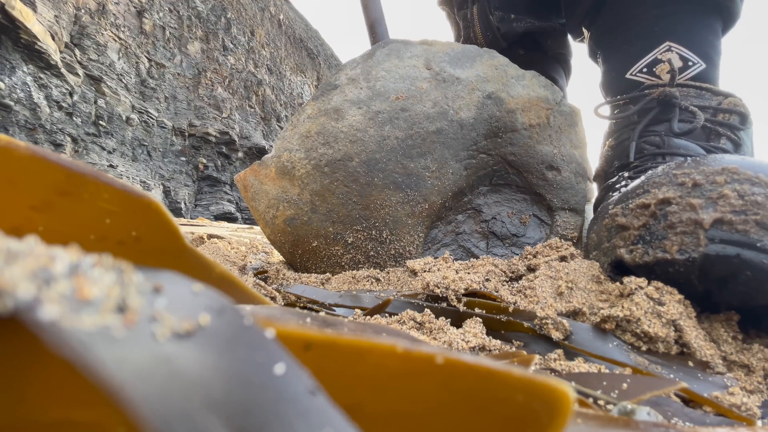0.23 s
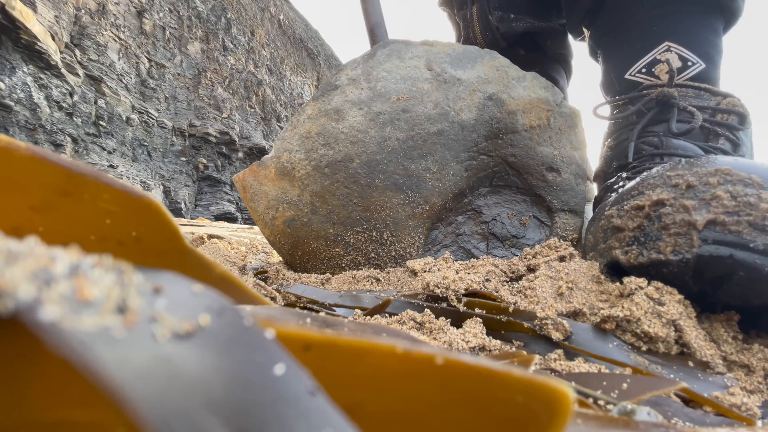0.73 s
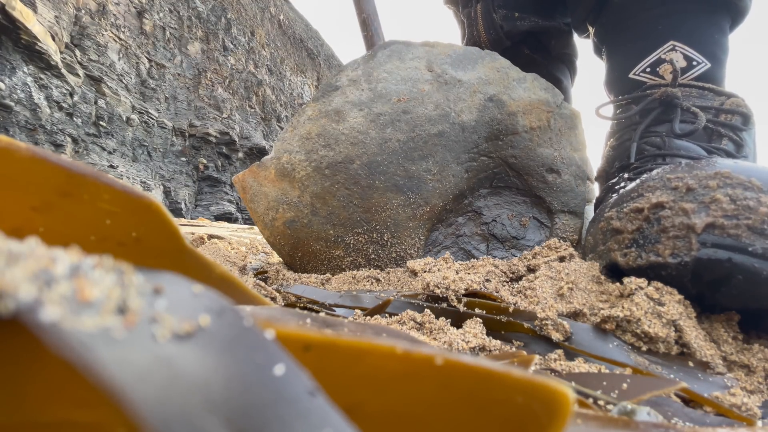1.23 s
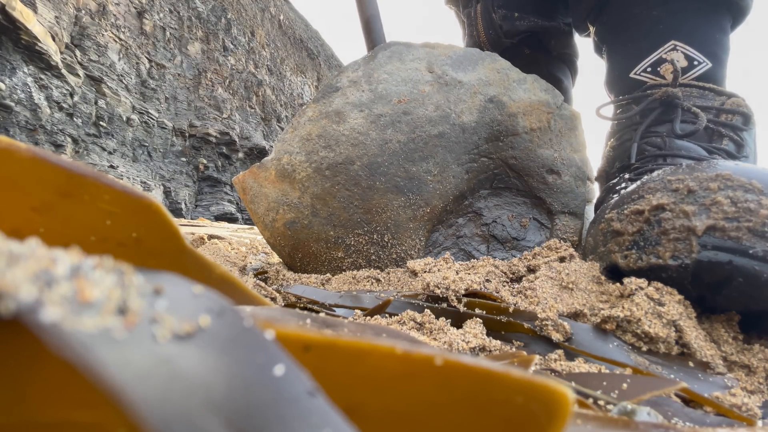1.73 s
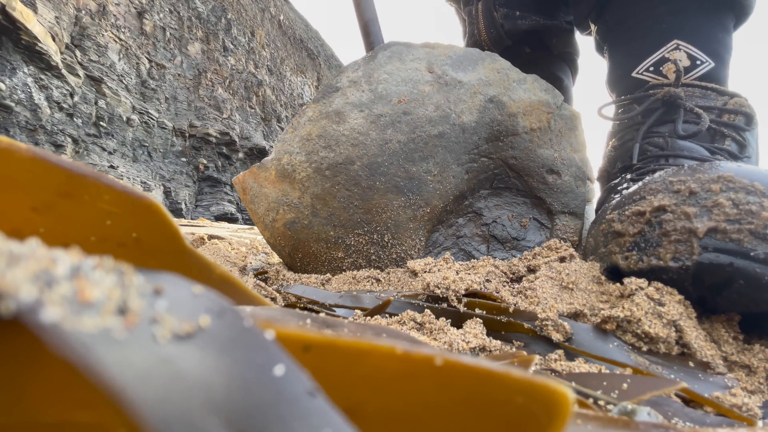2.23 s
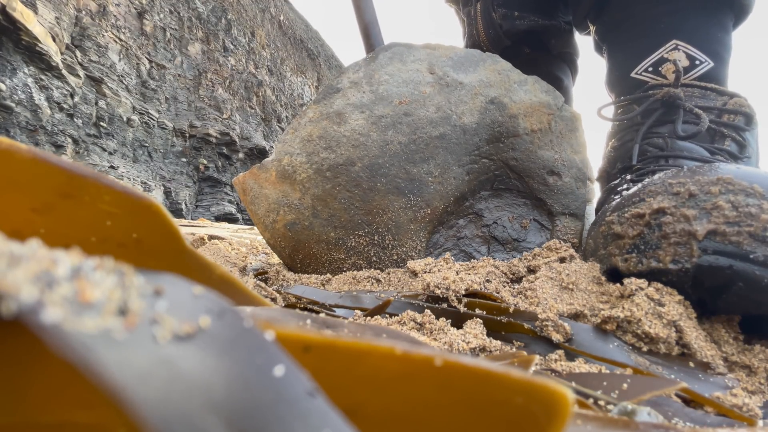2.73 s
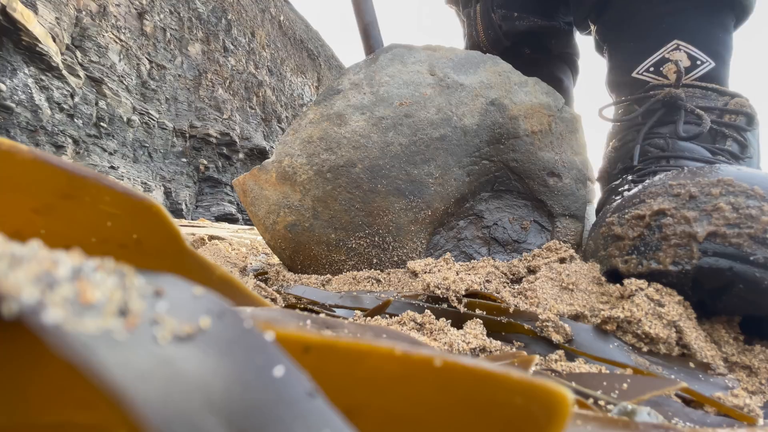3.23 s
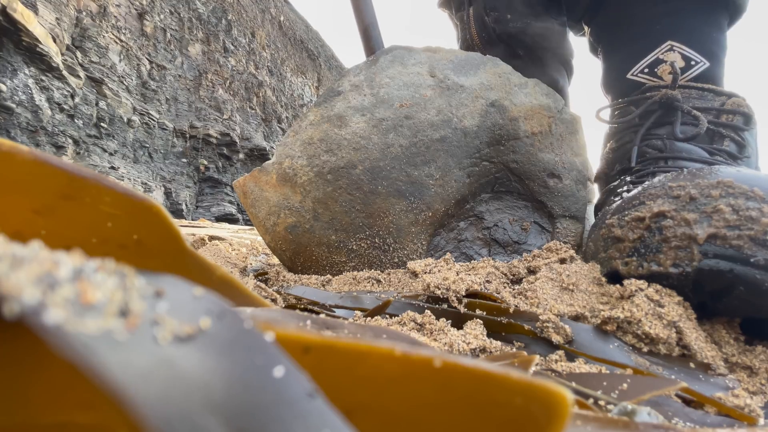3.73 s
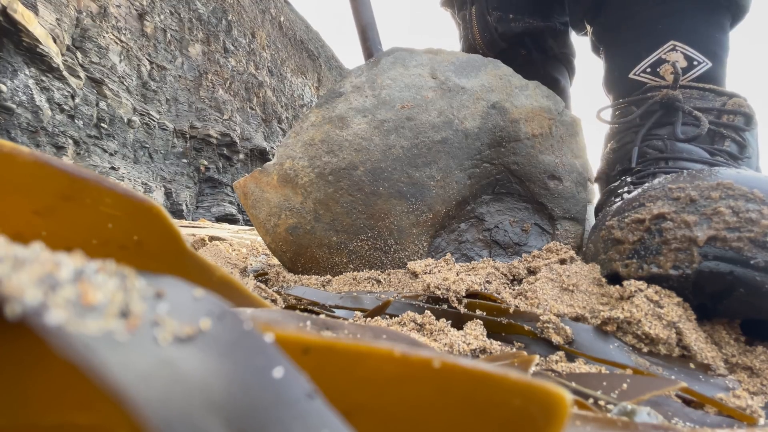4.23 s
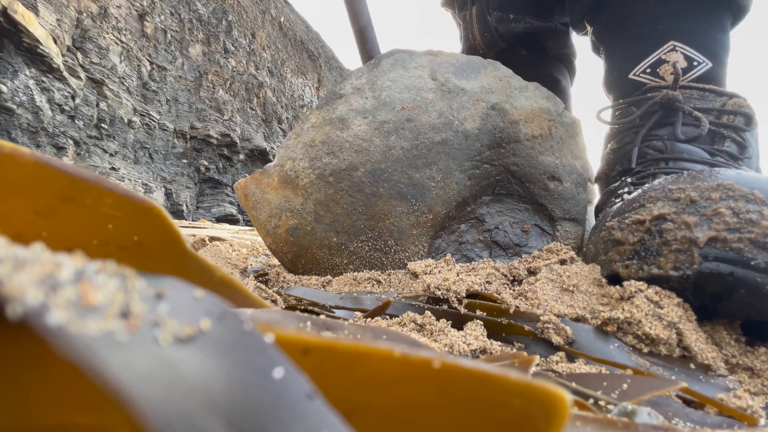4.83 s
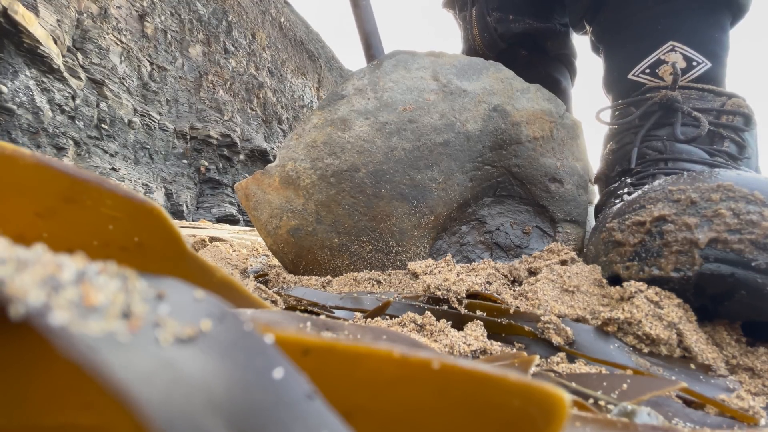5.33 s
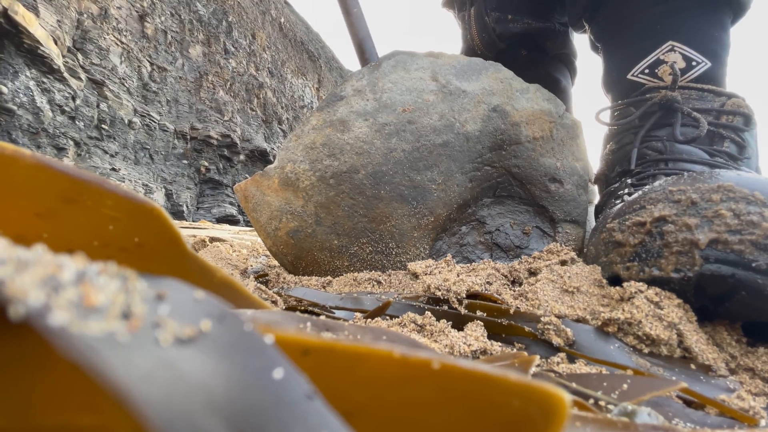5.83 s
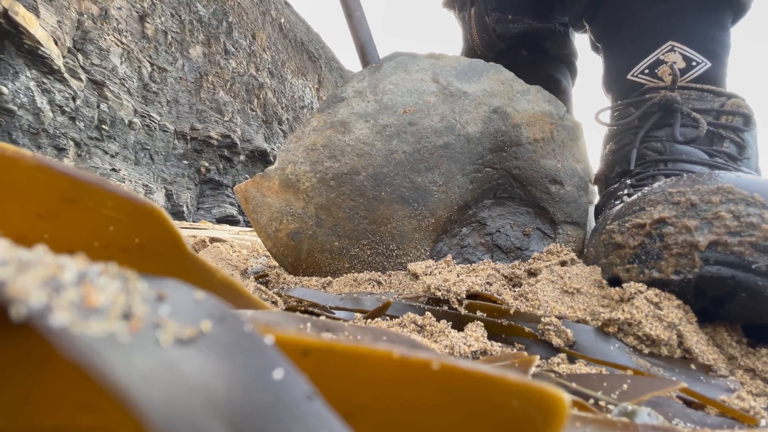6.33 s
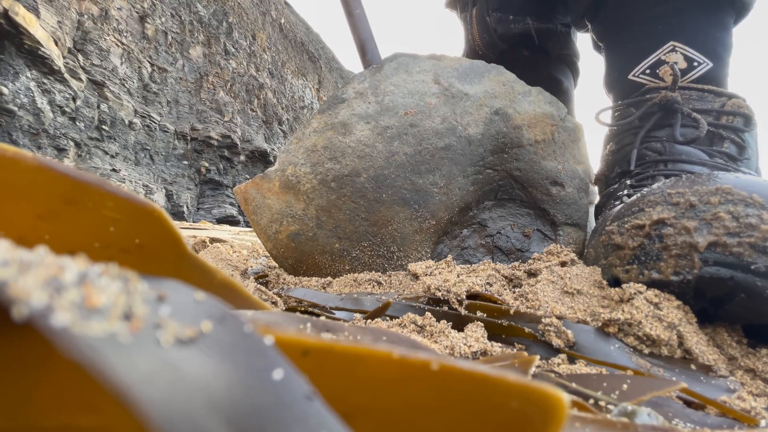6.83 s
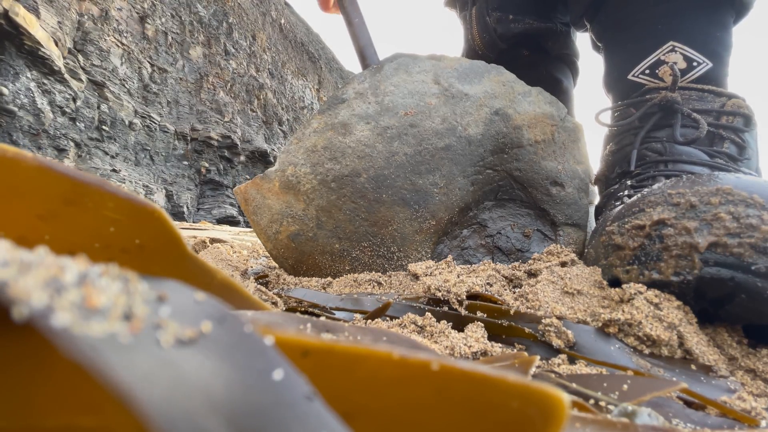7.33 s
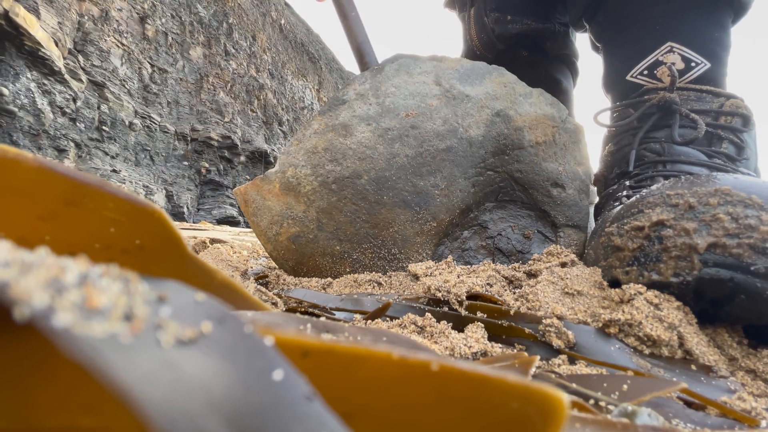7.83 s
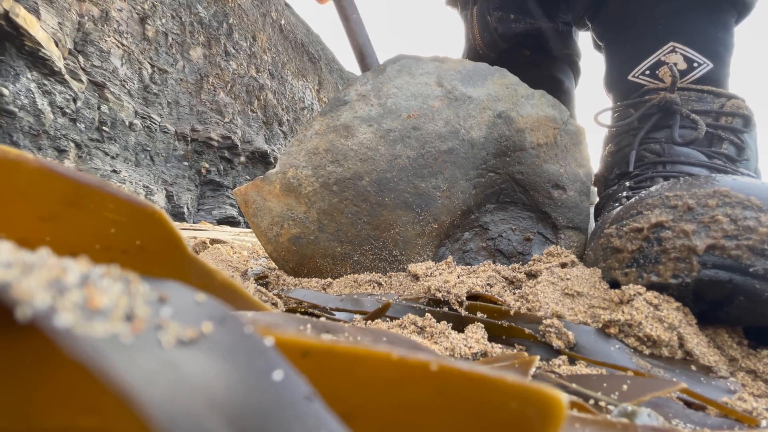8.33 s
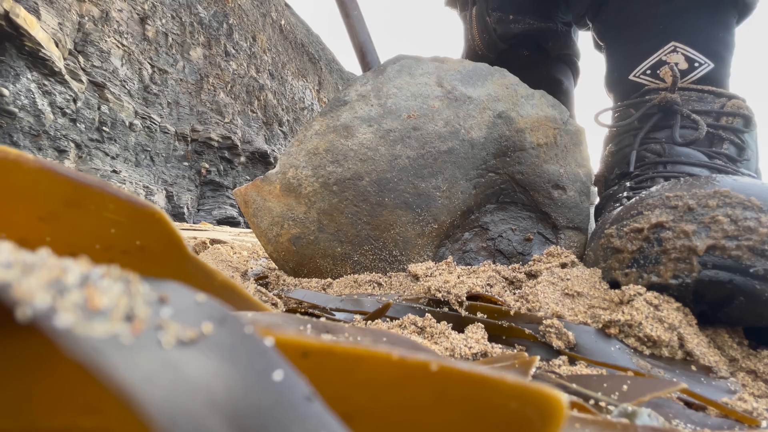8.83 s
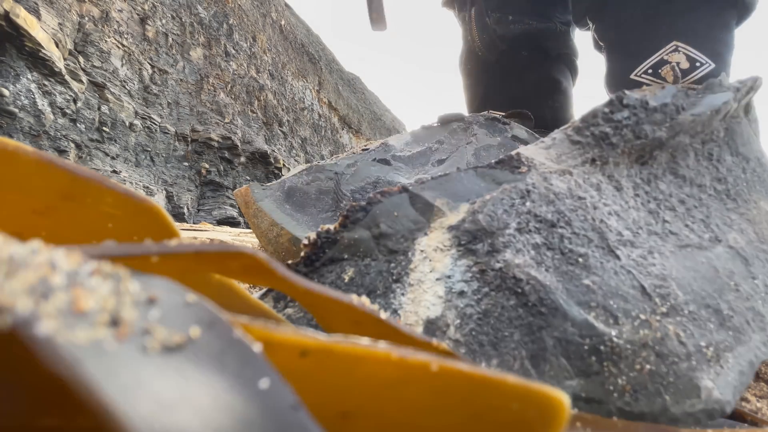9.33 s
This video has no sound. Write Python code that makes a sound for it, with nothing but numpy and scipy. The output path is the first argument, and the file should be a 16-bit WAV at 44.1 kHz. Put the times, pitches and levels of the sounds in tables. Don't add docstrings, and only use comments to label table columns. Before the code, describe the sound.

Outdoors on a sandy shore, with the microphone close to a boulder, a hammer drives a steel chisel. The first blow lands almost at once, then others at about 0.5, 1.1, 1.6, 2.3, 2.8, 3.5, 4.0, 4.8, 5.3, 6.1, 6.6, 7.6 and 8.1 seconds. Each is a loud, dry crack with bright, quickly choked metal ringing, a woody stone knock and a soft low thump arriving later through the sand; the ones near 1.6 and 4.8 have less body. Distant surf hisses steadily, clearest at the start, ducking after each blow and sinking until nearly gone. Chips tick at 5.4, 6.9 and 8.4-8.6 seconds. At 8.9 the strongest, duller blow splits the stone: within two tenths of a second the halves grind and rattle, sand trickles, and they land with a thud, leaving near quiet.

```python
import sys
import numpy as np
from scipy import signal
from scipy.fft import rfft, irfft, next_fast_len
from scipy.io import wavfile
from scipy.ndimage import uniform_filter1d

SR = 44100
rng = np.random.default_rng(int(sys.argv[2]) if len(sys.argv) > 2 else 0)


def generate_wav(signal):
    frames = np.transpose(np.atleast_2d(signal))
    scaled = np.clip(frames, -1, 1) * 32767
    pcm = np.round(scaled).astype(np.int16)
    wavfile.write(sys.argv[1], SR, pcm)


def ratio_of_db(decibels):
    return 10 ** (np.asarray(decibels, float) / 20)


N = 422037
TIME = np.arange(N) / SR

# [t/s, bite (stone knock)/dB, loose grip (shaft hum)/dB, edge (sharp stone contact)/dB,
# slant (sideways against lengthways ring)/dB]
BLOWS = [(0.062, -16.5, -48, -22, -1.5), (0.494, -17, -49.5, -32.5, -9), (1.134, -16.5, -33.5, -35, 0),
         (1.618, -28, -55, -23, 14.5), (2.321, -17.5, -50.5, -34, 18), (2.792, -16.5, -52.5, -25, -2),
         (3.549, -16, -37.5, -27.5, 3), (4.019, -16.5, -44, -27.5, 2), (4.819, -23, -59, -21.5, .6),
         (5.321, -15, -42.5, -26.5, -1.5), (6.105, -15.5, -53, -30, -5.5),
         (6.581, -14.5, -39.5, -28.5, -3.5), (7.641, -18, -53, -38, -3), (8.111, -13.5, -40, -24.5, -10),
         (8.927, -12, -49, -19.5, -5.5)]
# [f/Hz, density/dB per Hz]
CRACK_SPECTRUM = [(700, -13.5), (1100, -15), (2000, -19), (3300, -4.5), (4200, -14), (6500, -5.5),
                  (8500, -7.5), (10000, -14.5), (11300, -9), (12600, -10), (14800, -2), (16500, -17)]
LEAD_S = .02


def at_hz(points, hz):
    f_hz, level_db = np.transpose(points)
    return np.interp(np.log(hz + 1), np.log(f_hz), level_db)


def colour(x, gain_db):
    size = next_fast_len(x.shape[-1])
    gain = ratio_of_db(gain_db(np.fft.rfftfreq(size, 1 / SR)))
    return irfft(rfft(x, size) * gain, size)[..., :x.shape[-1]]


def rms_one(x):
    return x / np.sqrt(np.mean(x ** 2))


def peak_one(x):
    return x / np.abs(x).max()


def sine(hz, t):
    return np.sin(2 * np.pi * hz * t)


def swell(t, rise_s, t60_s):
    t = np.maximum(t, 0)
    shape = (1 - np.exp(-t / max(rise_s, 1e-4))) ** 2 * ratio_of_db(-60 * t / t60_s)
    return shape / shape.max()


def strike(t, rise_s, length_s):
    build = np.exp(np.minimum(t, 0) / rise_s)
    return np.where(t < 0, build, np.exp(-(np.abs(t) / length_s) ** 1.58))


def pair(db):
    return ratio_of_db(np.array([[db / 2], [-db / 2]]))


def add(out, sound, s):
    i = round(s * SR)
    out[:, i:i + sound.shape[1]] += sound[:, :N - i]


def drift(rate_hz):
    knots = rng.standard_normal(400)
    return uniform_filter1d(np.interp(TIME * rate_hz, np.arange(len(knots)), knots), size=400)


def surf(patchy_db=1.1):
    # [f/Hz, density/dB per Hz]
    mid_spectrum = [(15, -44), (25, -19.5), (54, -5), (244, -1.5), (403, -3), (448, -5.5), (991, -4.5),
                    (1330, -11.5), (1600, -6.5), (2570, -5.5), (3350, -11.5), (8030, -8), (10200, -13),
                    (11900, -8.5), (14000, -49.5)]
    side_spectrum = [(15, -50.5), (25, -21.5), (113, -16), (353, -5.5), (382, -12.5), (448, -2.5),
                     (741, -4), (1780, -8), (2440, -23), (3010, -13.5), (4370, -17.5), (10500, -10),
                     (11300, -13.5), (12300, -45), (14000, -55.5)]
    # [f/Hz, left-right/dB]
    surf_left = [(60, 3), (180, 0.5), (550, 4.5), (1650, 4), (4970, 3.5), (15000, 2.5)]
    # [f/Hz, width/Hz, depth/dB]
    shared_dips = [(1300, 150, -7), (3380, 170, -16), (4550, 200, -4), (6000, 400, -3), (10150, 750, -16)]

    def dips_db(hz):
        return sum(db / (1 + ((hz - f) / width * 2) ** 4) for f, width, db in shared_dips)

    white = rng.standard_normal((2, N))
    mid = rms_one(colour(white[0], lambda hz: at_hz(mid_spectrum, hz) - 14.0 / (1 + (hz / 34.0) ** 8)))
    side = ratio_of_db(1.5) * rms_one(colour(white[1], lambda hz: at_hz(side_spectrum, hz)))
    both = colour(np.array([mid + side, mid - side]), lambda hz: [[.5], [-.5]] * at_hz(surf_left, hz))
    shared = both.mean(axis=0)
    both += colour(shared, dips_db) - shared
    low, below = (signal.sosfilt(signal.butter(1, hz, fs=SR, output="sos"), both) for hz in (900, 3500))
    together = drift(22.0) + 0.32 * drift(6.0)
    registers = (low, below - low, both - below)
    return sum(band * ratio_of_db(patchy_db * (together + drift(16.0))) for band in registers)


def gain_control():
    # [t/s, level/dB]
    settled = [
        (0.06, -43.5),
        (0.5, -44),
        (1.13, -48.5),
        (1.62, -50.5),
        (2.32, -55.5),
        (2.8, -56),
        (3.55, -59),
        (4.8, -60),
        (6.5, -61),
    ]
    first_duck_db, duck_db, floor_db = 5.5, 14, -63
    lag_s, in_s, hold_s, out_s = .012, .018, .095, .087
    times, levels = [0], [-42]
    for k, (s, *_) in enumerate(BLOWS):
        dip_db = max(levels[-1] - (duck_db if k else first_duck_db), floor_db)
        times += list(s + np.cumsum([lag_s, in_s, hold_s, out_s]))
        levels += [levels[-1], dip_db, dip_db, np.interp(s, *np.transpose(settled))]
    return ratio_of_db(np.interp(TIME, times, levels))


def thumps():
    # [t/s, level/dB]
    swells = [(.235, -54), (.668, -60.5), (2.494, -64), (2.965, -60), (4.99, -65.5), (5.49, -63),
              (6.278, -56), (6.754, -55), (7.814, -55.5), (8.284, -60), (9.1, -63.5)]
    out, t = np.zeros((2, N)), np.arange(-8000, 8000) / SR
    for s, db in swells:
        add(out, ratio_of_db(db) * pair(6.8) * sine(44.0, t) * strike(t, .06, .06), s + t[0])
    return out


def tumble():
    i, size = round(8.96 * SR), 9500
    split_s, land_s, rise_s = 8.995, 9.071, .01
    grain_db = 2.5 * rng.exponential(1, size)
    present = rng.random(size) < 3000 / SR
    grains = rng.standard_normal((3, 2, size)) * ratio_of_db(grain_db) * present
    out, t = np.zeros((2, N)), TIME[i:i + size]
    crunch = (-43, split_s, .06, 420, 305, 1660)
    sand = (-46.5, split_s, .06, 250, 3000, 15000)
    thud = (-35, land_s, .008, 800, 59.6, 200)
    for grain, (db, s, hold_s, fade, low_hz, high_hz) in zip(grains, (crunch, sand, thud)):
        sos = signal.butter(4, [low_hz, high_hz], "band", fs=SR, output="sos")
        band = signal.sosfilt(sos, grain[0] + .5 * grain)
        rise = np.clip((t - s) / rise_s, 0, 1) ** 2
        fall_db = fade * np.maximum(t - s - rise_s - hold_s, 0)
        out[:, i:i + size] += rms_one(band) * rise * ratio_of_db(db - 7.5 - fall_db)
    return out


def chips():
    # [t/s, peak/dB, f/Hz, bright/dB]
    ticks = [(5.379, -47, 337, -1), (6.857, -36.5, 600, -19), (7.019, -57, 776, -6), (8.374, -57, 460, -10),
             (8.451, -42.5, 1730, -11), (8.567, -56, 764, -2), (8.979, -48, 1000, -11),
             (9.001, -29, 1440, -12), (9.017, -32, 1300, -2), (9.027, -31.5, 900, -14),
             (9.04, -31.5, 1400, -14), (9.045, -35, 447, -19), (9.051, -30.5, 700, -20),
             (9.057, -29, 1500, -23), (9.065, -38, 1320, -12), (9.07, -38, 810, -18),
             (9.076, -33, 293, -17), (9.109, -50, 853, -8), (9.129, -48, 624, -12)]
    out, t = np.zeros((2, N)), np.arange(3000) / SR
    dull = signal.butter(2, [350, 2000], "band", fs=SR, output="sos")
    for s, db, hz, bright_db in ticks:
        t60_s = .014 + 14.0 / hz
        noise = rng.standard_normal((3, len(t)))
        mode = (sine(hz, t) + 0.54 * sine(hz * 0.44, t)) * swell(t, 0.00056, .5 * t60_s)
        knock = peak_one(signal.sosfilt(dull, noise[2] * swell(t, .0004, 0.0088)))
        tick = mode + ratio_of_db(-12.0 + 8.0 * (hz > 650)) * knock
        speck = colour(noise[:2], lambda f: at_hz(CRACK_SPECTRUM, f) - 20.0 * (f > 12500))
        speck = speck * swell(t, .0003, .006)
        add(out, ratio_of_db(db - 4) * (tick * pair(1.5) + ratio_of_db(bright_db + 3.0) * peak_one(speck)), s + .0008)
    return out


def glints():
    # [t/s, f/Hz, level/dB]
    lone_rings = [
        (9.04, 2630, -51),
        (8.57, 750, -56),
        (6.862, 215, -48),
        (5.381, 2650, -53),
        (9.004, 2700, -49),
        (9.004, 3680, -45),
        (9.019, 4800, -40.5),
        (9.02, 11200, -43.5),
        (9.021, 2640, -46),
    ]
    out, t = np.zeros((2, N)), np.arange(3000) / SR
    for s, hz, db in lone_rings:
        add(out, ratio_of_db(db) * pair(0) * sine(hz, t) * swell(t, 0.00068, 0.041), s)
    return out


def shares(s, bite_db, hum_db, edge_db, slant):
    parts_hz = [11200, 2640, 4800, 7500, 9500, 3300, 5600, 8650, 600, 90, 350, 1000, 1570]
    # [t/s, f/Hz, change/dB]
    catches = [(.062, 350, -6), (.062, 90, 5), (.062, 11200, -5), (6.581, 5600, -7), (.062, 2640, 4),
               (.494, 350, 4), (4.819, 350, -4.5), (.494, 3300, -14), (.494, 2640, -4), (1.134, 5600, 8),
               (7.641, 350, -3), (2.321, 4800, 4), (2.321, 9500, -5), (2.792, 9500, 10), (2.792, 11200, 4),
               (3.549, 8650, 13), (3.549, 9500, 5), (3.549, 1570, -8), (4.019, 4800, -8), (4.019, 3300, 8),
               (5.321, 9500, -6), (4.819, 9500, -7), (5.321, 4800, 8), (5.321, 3300, 6), (5.321, 2640, 5),
               (6.105, 3300, 11), (6.105, 4800, -6), (7.641, 4800, 7), (8.111, 9500, 8), (8.927, 3300, -13)]
    bite, loose, edge = bite_db + 17, hum_db + 47, edge_db + 28
    depth = s - 4.3
    luck = 1 * rng.standard_normal(8)
    ring_db = [-14 - .35 * slant, -30.5 + .4 * loose + .4 * depth,
               -31.5 + .3 * loose - .6 * bite + luck[0],
               -25.5 + .6 * slant, -33 + 1.4 * depth + luck[1]]
    burst_db = [-23.5 + 1.1 * depth + .2 * slant + luck[2],
                -28 + .4 * slant - 1.5 * depth + luck[3], -29 - .9 * depth + luck[4]]
    knock_db = [bite_db, -32.5 - .3 * depth + .15 * bite, -23.5 + .3 * depth, edge_db,
                -34 + .7 * edge - .2 * loose - 1.2 * max(depth, 0) + luck[5]]
    cracked_db = -5 * (s > 8) * np.array([1, 0, 1, 1, 1] + [0] * 7 + [-2])
    parts = np.array(ring_db + burst_db + knock_db) + cracked_db
    for when, hz, db in catches:
        nearest = np.argmin(np.abs(np.log(hz / np.array(parts_hz))))
        parts[nearest] += db * (abs(when - s) < .1)
    crack_db = -14 + .15 * edge
    rebound_db = -8 - .3 * bite + .5 * luck[6]
    return crack_db, parts[:8], parts[8:], rebound_db, -60.5 + .35 * loose


def crack(t, s, crack_db, sharp_db):
    # [f/Hz, left-right/dB]
    crack_left = [(60, -3), (180, 1.5), (550, 5.5), (1650, -0.5), (4970, 6.5), (15000, -2.5)]
    noise = rng.standard_normal((3, len(t)))
    hits = strike(t, 0.0008, 0.0036) + .04 * strike(t, 0.0067, .004)
    wash = colour(noise[:2] * strike(t, .001, .018), lambda hz: -30.0 * (hz > 12400))
    burst = (noise[:2] + .6 * noise[2]) * hits + .035 * wash

    def gain_db(hz):
        dull_db = (18.0 * (s < .3) + 8.0 * (s > 8.5)) * (hz > 13000)
        stone_db = .7 * (sharp_db + 35) * np.exp(-(np.log((hz + 1) / 1950) / .25) ** 2)
        left_db = [[.5], [-.5]] * at_hz(crack_left, hz)
        return at_hz(CRACK_SPECTRUM, hz) - dull_db + stone_db + left_db

    return ratio_of_db(crack_db + 9.5) * peak_one(colour(burst, gain_db))


def chisel(t, s, steel_db, rebound_db):
    # [f/Hz, level/dB, rise/s, peak after contact/s, length/s, left-right/dB, left lead/rad]
    steel_modes = [(11246, -2.5, 0.00047, .001, 0.0048, 1, 1.7),
                   (10920, -6, .001, 0.00087, 0.0077, -2, 1.9), (2642, 4, .001, .003, 0.006, 12, 1.49),
                   (2630, -27.5, .003, .01, .02, 0, 2.2), (4815, 2.5, 0.0014, 0.0048, 0.0061, -4.5, .3),
                   (6160, -17.5, .003, 0.0068, 0.013, 8, .3), (7537, 5, 0.00088, 0.0027, 0.0065, 7.5, 2.24),
                   (7310, -8, 0.00093, 0.0027, 0.0077, 12, 1.84),
                   (9520, 11, 0.0014, 0.0018, 0.012, 0.5, 2.82),
                   (3300, 1.5, 0.00034, 0.00039, 0.0016, 10.5, 2.14),
                   (5576, 4.5, 0.0021, 0.00027, 0.0013, 8.5, 1.8),
                   (8650, 1, 0.00097, 0.00022, .0015, 5, 1.3)]
    mode_group = [0, 0, 1, 1, 2, 2, 3, 3, 4, 5, 6, 7]
    unseated = s < 1.1
    rough = .6 if unseated else .28
    out = np.zeros((2, len(t)))
    luck = rng.standard_normal((len(steel_modes), 3))
    for mode, group, (detune, phase, stretch) in zip(steel_modes, mode_group, luck):
        hz, mode_db, rise_s, late_s, length_s, left_db, lead_rad = mode
        ring = group < 5
        turns = 2 * np.pi * hz * (1 + .003 * detune) * t
        tone = np.sin(turns + 3 * phase + np.array([[lead_rad], [0]]))
        length_s = length_s * ratio_of_db(1.5 * stretch - 5.0 * unseated * ring)
        shape = strike(t - late_s, rise_s, length_s)
        shape = shape + ring * ratio_of_db(rebound_db) * strike(t - .0047, 0.00054, 0.0014)
        flutter = 1 + rough * rms_one(uniform_filter1d(rng.standard_normal(len(t)), size=50))
        out += ratio_of_db(steel_db[group] + mode_db) * pair(left_db) * tone * shape * flutter
    return out


def port(t, port_db):
    tone = np.sin(2 * np.pi * 1030 * t + np.array([[1.6], [0]]))
    return ratio_of_db(port_db + 4.5) * pair(-1.5) * tone * strike(t - .0015, 0.0027, .003)


def stone_knock(t, knock_db):
    # [f/Hz, level/dB, t60/s, delay/s, rise/s, left-right/dB]
    stone_modes = [(601, 1.5, 0.021, -.0005, 0.00074, 4), (796.5, -4, 0.018, -.001, 0.00047, 5),
                   (90.3, 4.5, 0.046, 0.01177, 0.0034, 3), (54.9, -17, .06, .025, 0.011, 4),
                   (356.4, 7, 0.014, .001, 0.0005, 7.5), (420, 0.5, 0.017, 0.0005, .001, 4.5),
                   (1570, 3.5, 0.0094, -.0005, 0.00037, 3.5)]
    stone_group = [0, 0, 1, 1, 2, 2, 4]
    start_hz, end_hz, sweep_s = 454.5, 83.5, 0.0055
    swept = (start_hz - end_hz) * sweep_s * (1 - np.exp(-np.maximum(t, 0) / sweep_s))
    wave = np.sin(2 * np.pi * (end_hz * t + swept))
    out = ratio_of_db(knock_db[2] + 5) * pair(5.7) * wave * swell(t, .0012, 0.035)
    for (hz, mode_db, t60_s, delay_s, rise_s, left_db), group in zip(stone_modes, stone_group):
        late = t - delay_s
        tone = np.sin(2 * np.pi * hz * late + np.array([[.25], [-.25]]))
        out += ratio_of_db(knock_db[group] + mode_db) * pair(left_db) * tone * swell(late, rise_s, t60_s)
    return out


def shaft_hum(t, hum_db):
    return ratio_of_db(hum_db) * pair(5.2) * sine(331.4, t) * swell(t, .004, 0.17)


def settling(t, settle_db):
    # [f/Hz, level/dB]
    settle_modes = [(2652, -1.5), (2576, -5), (4800, -13), (7480, -7), (7400, -10)]
    tones = sum(ratio_of_db(settle_db + mode_db) * sine(hz, t) for hz, mode_db in settle_modes)
    return pair(5.0) * tones * strike(t - .058, .003, 0.021)


def blows():
    steel_lag_s, knock_lag_s = .0028, .0027
    out = np.zeros((2, N))
    t = np.arange(14000) / SR - LEAD_S
    short = t[:5000]
    for s, bite_db, hum_db, edge_db, slant in BLOWS:
        crack_db, steel_db, knock_db, rebound_db, settle_db = shares(s, bite_db, hum_db, edge_db, slant)
        steel = crack(short, s, crack_db, knock_db[4]) + chisel(short, s, steel_db, rebound_db)
        steel += port(short, knock_db[3])
        answer = shaft_hum(t, hum_db) - stone_knock(t, knock_db) + settling(t, settle_db)
        add(out, answer, s + knock_lag_s - LEAD_S)
        add(out, steel, s + steel_lag_s - LEAD_S)
    return out


def scene():
    return surf() * gain_control() + thumps() + tumble() + chips() + glints() + blows()


def top_cut(x):
    return signal.sosfilt(signal.butter(12, 16780, fs=SR, output="sos"), x)


def record(dry):
    limited = dry / (1 + (np.abs(dry) / .82) ** 6) ** (1 / 6)

    def top_db(hz):
        return -24.0 / (1 + (12700 / (hz + 1)) ** 40) - 30.0 / (1 + (16800 / (hz + 1)) ** 40)

    return top_cut(colour(limited, top_db))


dry = scene()
out = record(dry)
generate_wav(out)
```